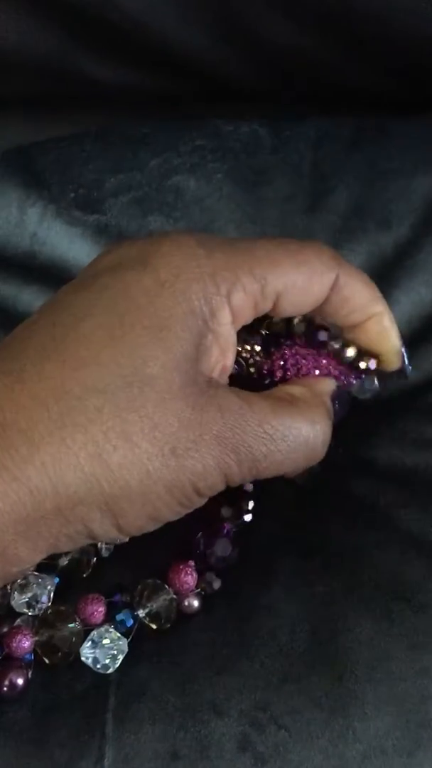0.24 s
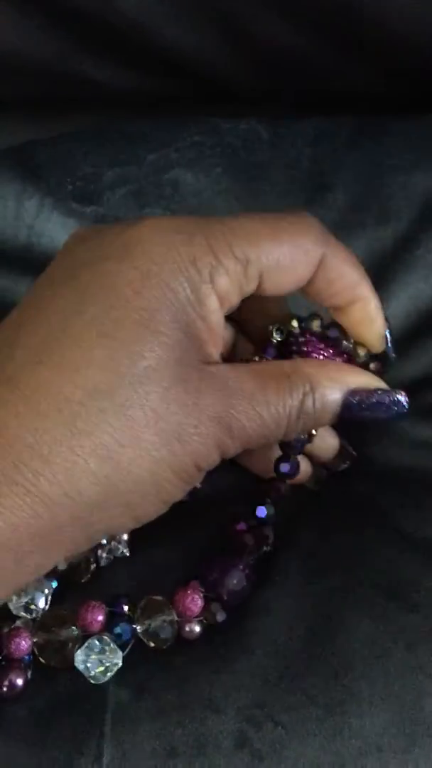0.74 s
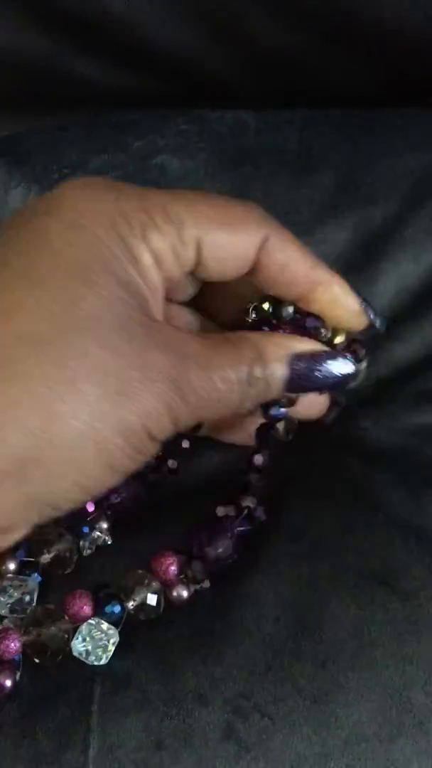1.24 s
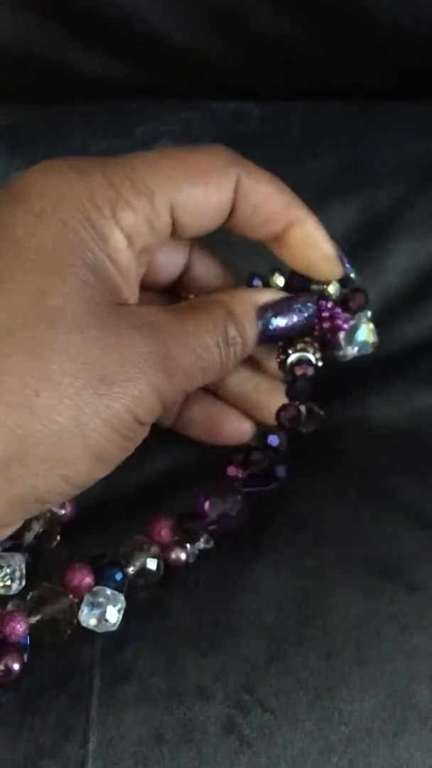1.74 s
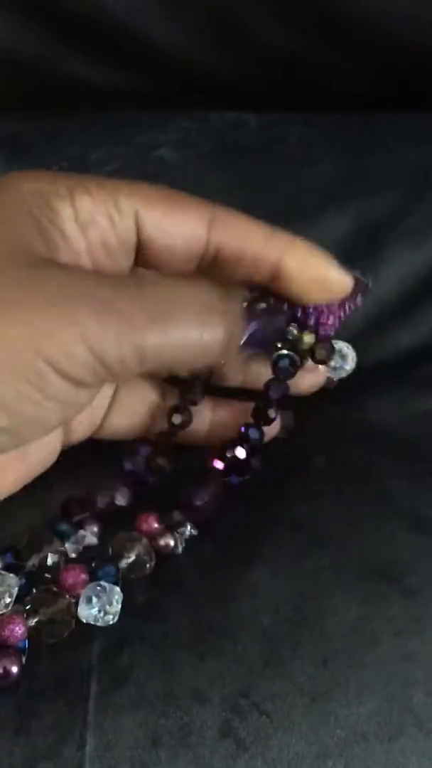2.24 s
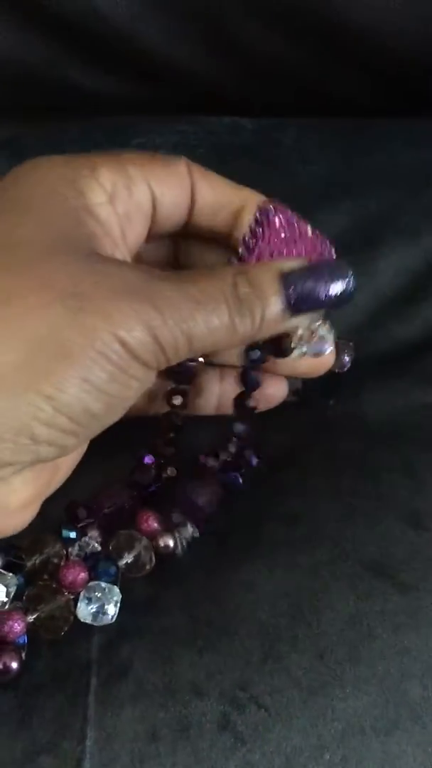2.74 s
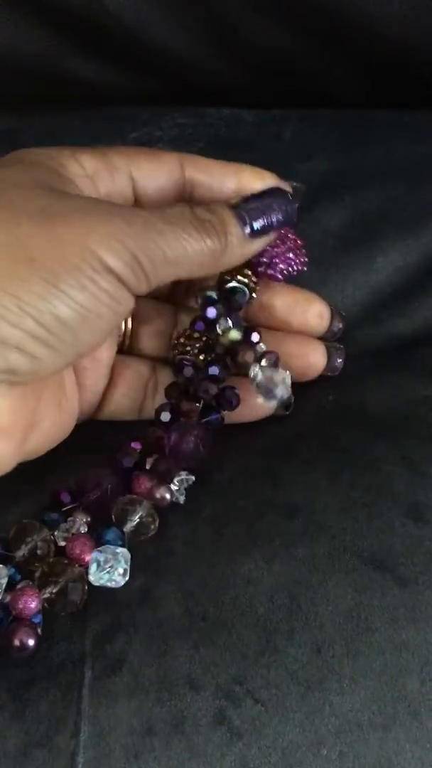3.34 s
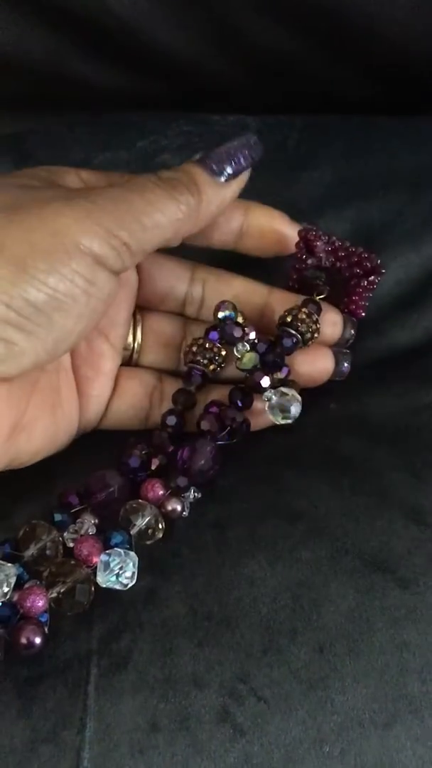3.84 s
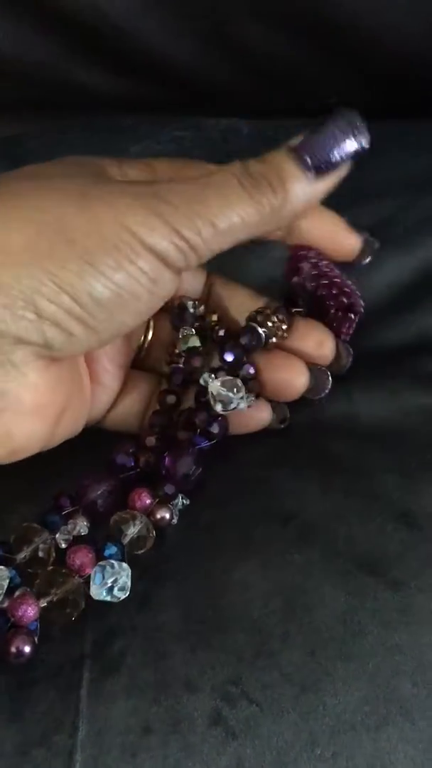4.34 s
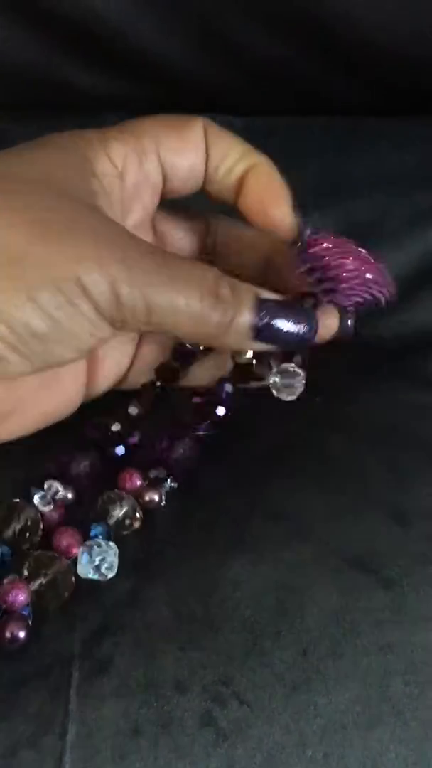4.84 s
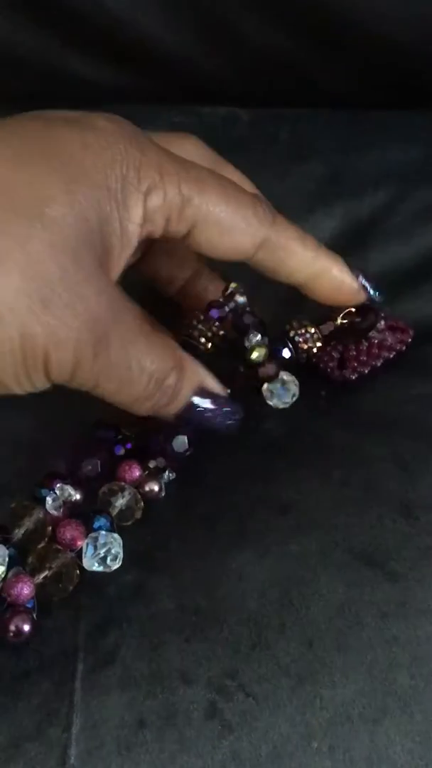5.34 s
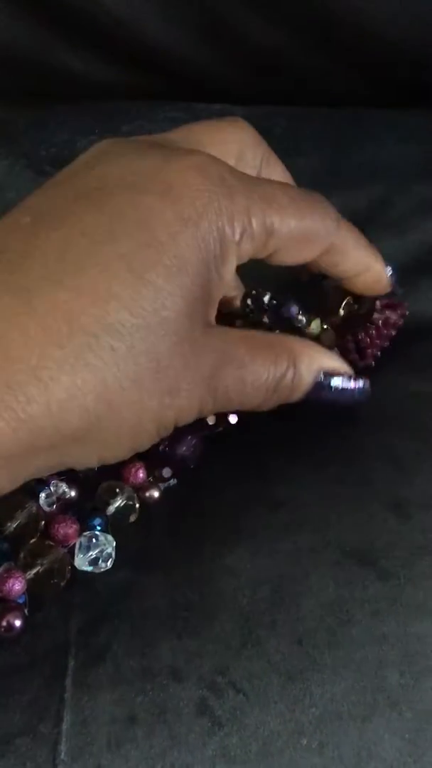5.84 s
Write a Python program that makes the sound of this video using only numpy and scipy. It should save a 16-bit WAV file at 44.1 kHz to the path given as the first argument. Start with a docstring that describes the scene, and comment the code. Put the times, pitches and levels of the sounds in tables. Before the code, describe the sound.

Close to the microphone in a quiet, small, dry room, a hand handles faceted glass beads on a velvet cushion. Faint ticks and soft bumps open; at 0.28 s a click leads into a loud, tight cluster of hard, bright snaps at 0.32-0.35 s, with a dull low thump, rattling on to 0.47 s. Single clicks follow at 0.58, 0.92 (with a thump), a very sharp one at 1.0, then 1.16 and 1.28 s. A light run of clicks and a brief grind fill 1.5-1.75 s, with softer ones around 1.95-2.15 s. After faint ticks, a clear snap lands at 2.84 s, then a small flurry at 3.0-3.2 s. From 3.5 to 4.5 s it is nearly still. Light ticks return at 4.6 s, skin brushes velvet at 4.8 s, and sparse delicate clicks continue to 6.1 s over faint hiss and low hum.

```python
"""Glass beads on a cushion

A hand turns a strand of faceted glass beads on a velvet cushion, close to a phone.
Beads snap together in sharp blows and small rebounds that ring a set of resonances; grinds are runs of these.
The hand thumps the cushion with sinking low swings and slides on it as grainy, coloured noise.
The walls answer with short echoes and a noise tail; a low hum and a steady hiss lie underneath."""
import sys
import numpy as np
from scipy import signal
from scipy.fft import rfft, irfft, next_fast_len
from scipy.io import wavfile
from scipy.ndimage import map_coordinates

SR = 44100
rng = np.random.default_rng(int(sys.argv[2]) if len(sys.argv) > 2 else 0)


def invert_db(x):
    """Field ratio 10**(x/20) for x, a level in decibels (scalar or array-like)."""
    u = np.asarray(x, float) / 20
    return 10 ** u


def inscribe(sig):
    """Save sig as 16-bit PCM at rate SR to the path in sys.argv[1].

    A 1-D sig is mono; a 2-D sig holds one channel per row.
    Samples are clipped to [-1, 1] before scaling.
    """
    pcm = np.round(np.clip(np.atleast_2d(sig).T, -1, 1) * 32767)
    wavfile.write(sys.argv[1], SR, pcm.astype(np.int16))


N = 268827  # length of the scene in samples

# Spectrum of the steady hiss, shape only: pitch_hz, level_db (per Hz)
HISS_SPECTRUM = [(240, -34), (400, 1), (606, -3), (2170, -9.5), (2950, -14.5), (4550, -15.5), (12400, -18),
                 (15800, -23)]
# How long the wall tail takes to lose 60 dB: pitch_hz, decay_s
WALL_DECAY = [(500, 0.25), (3000, 0.19), (8000, 0.12), (15000, 0.047)]
# Echoes from the cushion edge and nearest walls: delay_ms, level_db
WALL_ECHOES = [(5.5, -38.5), (10.5, -21.5), (15, -31), (19.5, -34.5)]
# Skin sliding over velvet and beads, the slow part: time_s, level_db
SLIDE_LEVEL = [(0, -72.5), (.29, -75), (.5, -69), (.68, -67), (.78, -74.5), (.9, -66.5), (1.3, -67.5),
               (1.66, -69), (1.72, -76), (1.9, -78.5), (2.3, -73.5), (2.68, -77), (3.34, -72),
               (3.95, -78.5), (4.11, -75), (4.74, -77.5), (4.765, -65), (4.9, -66), (4.99, -78.5),
               (5.18, -68.5), (5.32, -73), (5.75, -75.5), (6.094, -72.5)]
# Pressure of the hand, which guides the rumble and the hum: time_s, level_db
PRESS_LEVEL = [(0, -61.5), (.27, -65), (.47, -57), (.61, -63), (1.5, -62), (1.75, -64.5), (2.4, -71),
               (2.86, -69.5), (3.3, -66), (4.2, -71), (4.55, -70.5), (4.65, -65), (5.05, -65.5), (5.2, -68),
               (5.5, -65.5), (6.09, -66)]
# Spectrum of skin on velvet, shape only: pitch_hz, level_db (per Hz)
RUSTLE_SPECTRUM = [(290, -35.5), (500, -7), (817, -1.5), (1140, -0.5), (1780, -3), (2120, -1.5),
                   (2910, -7.5), (6090, -11), (15800, -22.5)]
# Spectrum of the brighter part of the sliding, shape only: pitch_hz, level_db (per Hz)
SIZZLE_SPECTRUM = [(1500, -36.5), (3500, 4), (6500, -0.5), (10000, -1.5), (16000, -9)]
# Spectrum of the cushion rumbling, shape only: pitch_hz, level_db (per Hz)
RUMBLE_SPECTRUM = [(15, -45.5), (25, -15), (48, 2.5), (119, -8), (189, -10.5), (226, -11), (390, -15.5),
                   (700, -30), (910, -65), (1540, -120)]
# The hand bumps the cushion: time_s, peak_db, starting_pitch_hz, knock_peak_db
BUMPS = [(.04, -49, 205, -49.5), (0.073, -45.5, 175, -56), (0.176, -37, 269, -46.5), (.287, -35, 151, -69),
         (0.3267, -33.5, 234, -50), (0.3332, -30.5, 240, -41), (0.3401, -28, 263, -47),
         (0.3466, -18, 180, -46), (0.3787, -40, 156, -62), (0.4133, -40, 171, -51), (.438, -24.5, 205, -50),
         (.4602, -30.5, 202, -49.5), (0.4662, -29, 163, -56), (0.5813, -42, 206, -70),
         (0.9182, -23.5, 173, -42), (1.0044, -49, 193, -51.5), (1.1454, -43, 225, -55),
         (1.199, -50.5, 200, -55), (1.2767, -42, 165, -72), (1.509, -49.5, 152, -62.5),
         (1.5692, -38.5, 166, -48.5), (2.087, -46, 115, -51), (3.122, -48, 215, -71.5),
         (3.662, -54.5, 234, -59), (5.0501, -43, 274, -57), (5.0841, -43, 212, -54), (5.527, -62, 203, -54),
         (5.705, -66, 195, -57), (5.9997, -41, 190, -53.5)]
# What the beads and the hollow of the hand ring with: pitch_hz, width_hz, level_db
RESONANCES = [(1200, 600, -21), (2468, 810, -12.5), (3510, 660, -5.5), (4650, 1200, -7.5), (6200, 380, 1.5),
              (7030, 2100, -4), (9000, 860, 0), (10800, 2500, -2.5), (12120, 1660, 1), (14700, 3500, -10.5)]
# Facets grinding past each other: start_s, length_ms, typical_contact_peak_db, favoured_pitch_hz
GRIND_EVENTS = [(0.896, 16, -69.5, 6500), (1.561, 11.6, -32, 6700), (1.643, 5.6, -42, 6400),
                (3.045, 27.2, -52, 6200), (4.765, 148, -64.5, 6220), (.35, 30, -44, 4650),
                (2.482, 59, -60.5, 6150), (2.982, 12, -50.5, 5500), (3.221, 28, -62, 4700),
                (3.478, 20.4, -53, 6200), (4.516, 30, -63.5, 7000), (4.61, 26, -64.5, 6200),
                (4.991, 19, -61.5, 6200)]
# Bead contacts: time_s, peak_db, favoured_pitch_hz, low_rings_db, high_rings_db
# (the two ring columns are relative settings; snap() adds the same amount to both)
CONTACTS = [(.0394, -44, 3660, 2, -20), (.0618, -42, 9100, -1, -2), (.1775, -42, 3560, -6, -12),
            (0.223, -47.5, 9110, -2, -22.5), (0.277, -21, 5600, -3.5, -5),
            (0.324, -4.5, 12750, -16.5, -3.5), (0.3261, -18, 9000, -5.5, 8.5), (.331, -13, 12400, -8, -7),
            (0.3359, -6, 9000, -2.5, -11), (0.3392, -10, 4650, -2, 1), (0.3414, -6, 9000, -2.5, -5),
            (0.3464, -15.5, 4650, 5, -20), (0.3771, -29, 10800, 9, 0.5), (.41, -27, 9000, -4, -6),
            (.4299, -23.5, 9000, -8, -3), (.4361, -26.5, 9500, 17, -11), (.4465, -39.5, 4600, 3, -10),
            (0.4578, -28, 6400, 20, -1), (0.4633, -19, 9000, 7, -1), (0.577, -20, 9000, -13.5, -5.5),
            (0.6668, -44, 8770, 3, -12), (.915, -11, 6540, -9, 0.5), (0.9767, -48.5, 7300, 0, -2),
            (.9906, -44.5, 9000, -2, -17), (1.0027, -3.5, 8640, -19.5, -5.5),
            (1.1299, -29.5, 8800, -11, -5), (1.1595, -15.5, 9100, -15, -5.5), (1.198, -29.5, 4200, 5, 1.5),
            (1.231, -35.5, 9000, -12.5, -13.5), (1.2345, -39, 9000, 4, -1),
            (1.276, -9.5, 8330, -10.5, -4.5), (1.2801, -21.5, 6830, -15, -5.5), (1.503, -42, 4260, 9, -20),
            (1.507, -28, 8450, -6.5, -16), (1.5452, -43, 12600, -4, 8), (1.5642, -22.5, 8400, -11, -12),
            (1.5676, -23, 8600, -6, -10), (1.5727, -23.5, 10100, -4, -2), (1.5988, -25.5, 6360, -4, -20),
            (1.627, -25.5, 11020, -6.5, -8), (1.631, -22.5, 6800, -17, -10),
            (1.6375, -22.5, 6400, -14, -10), (1.6502, -23, 6100, 3.5, -28), (1.654, -33.5, 6260, 0.5, -16),
            (1.667, -37.5, 6560, 4, -4), (1.6828, -37, 11300, 1, -5), (1.6863, -39, 6330, -12.5, -5),
            (1.7355, -31.5, 6260, -5.5, -10.5), (1.79, -44, 6400, -2.5, -8), (1.839, -32, 7000, -6.5, -5.5),
            (1.9389, -25, 8900, -9.5, -18), (1.9795, -20.5, 7670, -8.5, -20),
            (1.983, -29, 6500, -10.5, -19), (1.9873, -45, 6570, -11.5, -21), (2.038, -38.5, 4100, 0, -17),
            (2.0732, -32.5, 5940, -9, -11), (2.0769, -37, 5550, -5.5, 1), (2.0815, -37.5, 6500, 1, -13.5),
            (2.0865, -35.5, 6500, 11, -7), (2.0988, -38.5, 6070, 8.5, -19.5), (2.1057, -27.5, 6200, -6, -8),
            (2.112, -30, 6180, -6, -16), (2.116, -36.5, 5600, 4, -3), (2.134, -46, 4650, 4, -17),
            (2.145, -33, 9900, -2.5, -9.5), (2.2597, -46.5, 6600, -7, -20.5), (2.277, -42, 5630, -3.5, -16),
            (2.32, -44.5, 8560, -10, -12), (2.3993, -42, 6260, -16, -20), (2.415, -37.5, 9000, 4, -17),
            (2.4372, -42.5, 6460, 2.5, -16.5), (2.451, -43, 6440, -11, -5), (2.4705, -37, 6800, -11.5, -9),
            (2.4765, -38, 6900, -3, -16), (2.784, -42, 6130, -8.5, -17), (2.8433, -17, 5770, -13.5, -10.5),
            (2.8547, -29, 9000, -3.5, -3), (2.864, -40.5, 11060, 5.5, -2), (2.8681, -43, 11300, -18, 9),
            (2.9194, -46, 6300, -5, -8), (2.9933, -40, 4590, 3.5, -7), (2.996, -41, 5740, -14, -15.5),
            (3.0, -33, 7800, -4, -21), (3.033, -35.5, 9000, -5.5, -5), (3.0409, -30, 6140, -4, -5),
            (3.0482, -24.5, 11640, -9, -6), (3.055, -28.5, 9300, -4, -11), (3.059, -31.5, 6260, 3, -12),
            (3.066, -37, 9100, -4, -5), (3.0895, -39, 8800, -4, -8), (3.1143, -35.5, 8560, -14, -13),
            (3.1198, -32, 7740, -14, -8.5), (3.1243, -45.5, 6660, -14, -11), (3.1576, -30, 9000, -7, -11),
            (3.1721, -31.5, 9000, 0.5, 3), (3.1762, -40.5, 6060, -3, -5.5), (3.218, -44.5, 9350, 2, -6),
            (3.359, -43.5, 8000, -9.5, -12), (3.415, -50, 8140, -8, -14), (3.4577, -39.5, 8150, -26, -7),
            (3.5053, -35, 8930, -10.5, -21.5), (3.5437, -51.5, 3570, 10, -12),
            (3.598, -31.5, 12760, -7.5, 1.5), (3.659, -49, 4440, 3, -7.5), (3.672, -49.5, 3220, 21.5, -7.5),
            (3.881, -52.5, 4330, 4, -14), (4.2915, -45.5, 6250, 3, -11), (4.4011, -51, 6200, -17.5, -3),
            (4.426, -47.5, 6840, -4.5, -13), (4.4564, -48.5, 8270, -4, -16), (4.5435, -44, 7100, -1, -8.5),
            (4.5851, -36.5, 12500, 1, -8), (4.6033, -27.5, 6200, -5, -12), (4.794, -42.5, 8360, -8, -5.5),
            (4.8917, -44, 6200, -5, -7.5), (4.9214, -33, 12900, -12.5, -6), (4.9598, -39.5, 8600, -8, -8),
            (5.0232, -32.5, 10900, -8, -3.5), (5.0292, -31, 8840, -9.5, -4), (5.0332, -32.5, 6200, -20, -5),
            (5.053, -36.5, 6100, -4, -24.5), (5.0816, -39, 9000, 2.5, -22), (5.147, -38.5, 8750, 0.5, -11),
            (5.1578, -33.5, 6200, -14, -9), (5.166, -37.5, 8160, -10, -8.5),
            (5.2218, -49, 10000, -14, -2.5), (5.3411, -30, 6200, -6, -23.5), (5.467, -49.5, 4700, 2, -17),
            (5.4858, -45, 8800, -7, -5.5), (5.5264, -50, 3630, -1, -8), (5.539, -47.5, 6200, 2.5, -12.5),
            (5.7829, -32.5, 6200, -5.5, -25), (5.886, -49.5, 6270, 0.5, -11.5),
            (5.9292, -31.5, 6200, 4, -19), (5.931, -33, 6300, 4.5, -22), (5.953, -43.5, 4170, 2, 3),
            (5.956, -34.5, 6250, -6.5, -11.5), (5.998, -28.5, 8700, -7.5, -10),
            (6.0026, -38, 6200, -2, -13), (6.0361, -40.5, 6200, 5, -21), (6.0488, -42, 6640, -8, -20),
            (6.0643, -42.5, 3720, -0.5, -9)]

LEAD = 70  # samples of rising lead-in before a blow


def unit(x):
    """Scales a sound to rms 1."""
    return x / np.sqrt(np.mean(x ** 2) + 1e-20)


def along(points, hz):
    """Reads a curve of (Hz, value) points on a log pitch axis."""
    f, v = np.transpose(points)
    return np.interp(np.log(hz + 1), np.log(f + 1), v)


def curve(rows):
    """Joins (s, value) rows with straight lines, one value per sample."""
    s, v = np.transpose(rows)
    return np.interp(np.arange(N) / SR, s, v)


def wobble(rate):
    """Draws a smooth random curve with this many knots a second."""
    knots = rng.standard_normal(int(N * rate / SR) + 4)
    return map_coordinates(knots, [np.arange(N) * rate / SR])


def coloured(x, spectrum):
    """Filters x to a spectrum and scales it to rms 1."""
    m = next_fast_len(N + 8192)
    gain = invert_db(along(spectrum, np.fft.rfftfreq(m, 1 / SR)))
    return unit(irfft(rfft(x, m) * gain, m)[:N])


def hiss():
    """Steady room air and microphone noise: coloured random samples."""
    return invert_db(-86.5) * coloured(rng.standard_normal(N), HISS_SPECTRUM)


def hum():
    """A narrow band of noise, an unsteady low hum that rises and falls with the pressure of the hand."""
    pitch_hz, width_hz = 116, 16
    band = [(pitch_hz - 3 * width_hz, -60), (pitch_hz - width_hz, -12), (pitch_hz, 0),
            (pitch_hz + width_hz, -12), (pitch_hz + 3 * width_hz, -60)]
    level_db = curve(PRESS_LEVEL) - 5 + 2 * wobble(2.9)
    return invert_db(level_db) * coloured(rng.standard_normal(N), band)


def walls(x):
    """A few smeared slaps and a diffuse tail; new ones each fifth of a second as the hand moves."""
    out, step = np.zeros(N + SR), SR // 5
    for at in range(0, N, step):
        # noise that fades at its own speed at each pitch
        hz, t, z = signal.stft(rng.standard_normal(SR // 3), SR, nperseg=256)
        fade = invert_db(-60 * t / along(WALL_DECAY, hz)[:, None])
        tail = signal.istft(z * fade, SR, nperseg=256)[1]
        tail = invert_db(-22.0) * tail / np.linalg.norm(tail)
        tail = np.pad(tail, (round(0.0059 * SR), 0))  # the tail waits 5.9 ms
        for ms, db in WALL_ECHOES:
            slap = rng.standard_normal(90) * np.exp(-np.arange(90) / 30)
            tail[round(ms * SR / 1000):][:90] += invert_db(db) * slap / np.linalg.norm(slap)
        wet = signal.fftconvolve(x[at:at + step], tail)
        out[at:at + len(wet)] += wet
    return out[:N]


def sliding():
    """Level in dB of the rubbing: the slow slide, and a brief swell around every click and bump."""
    stir_db, stir_grows, stir_s = -66, .3, 0.015  # strand dragged: level at a 0 dB click, dB per dB, fade time
    jolt_db, jolt_s = -46, 0.01  # skin shifted: level against the bump's peak, fade time
    swells, t = np.zeros((2, N)), np.arange(-SR // 4, SR // 4 + 1) / SR
    for s, db, *_ in CONTACTS:
        swells[0, round(s * SR)] = invert_db(2 * (stir_db + stir_grows * db))
    for s, db, *_ in BUMPS:
        swells[1, round(s * SR)] = invert_db(2 * (jolt_db + db))
    shape = np.exp(-np.abs(t) / np.array([[stir_s], [jolt_s]]))  # swells before and after the event
    swell_power = np.abs(signal.fftconvolve(swells, shape, "same", axes=1).sum(0))
    power = invert_db(2 * curve(SLIDE_LEVEL)) + swell_power
    return 10 * np.log10(power)


def hand(slide_db):
    """Skin drags over the pile in fine grains, brighter when faster; pressure rumbles in lumps."""
    grains = rng.standard_normal((2, N)) * invert_db(2 * wobble(400) + wobble(40))
    rustle = invert_db(slide_db + 0.5) * coloured(grains[0], RUSTLE_SPECTRUM)
    sizzle_db = -72.5 + 1.2 * (slide_db + 71)  # grows faster than the rustle
    sizzle = invert_db(sizzle_db) * coloured(grains[1], SIZZLE_SPECTRUM)
    lumps = rng.standard_normal(N) * invert_db(2.8 * wobble(25))
    rumble = invert_db(curve(PRESS_LEVEL) + 3.5) * coloured(lumps, RUMBLE_SPECTRUM)
    return rustle + sizzle + rumble


def thumps():
    """Soft bumps: a low swing that sinks and dies in a few cycles, with a short knock of knuckle or nail."""
    sag_to, sag_s = .72, 0.019  # the pitch sinks to this share, with this time constant
    cycles = 4.6  # swings at the starting pitch until the low swing has lost 60 dB
    slap_ratio, slap_db, slap_t60_s = 2.1, -14.5, 0.024  # a short upper swing, set against the low one
    out, t = np.zeros(N + SR), np.arange(SR // 8) / SR
    luck = rng.standard_normal((len(BUMPS), 2))
    for (s, db, hz, knock_db), row in zip(BUMPS, luck):
        turns = hz * (sag_to * t + (1 - sag_to) * sag_s * (1 - np.exp(-t / sag_s)))
        swing_rise = (1 - np.exp(-t / 0.0016)) ** 2
        swing = -np.sin(2 * np.pi * turns) * invert_db(-60 * t * hz / cycles) * swing_rise
        slap = invert_db(slap_db - 60 * t / slap_t60_s) * np.sin(2 * np.pi * slap_ratio * hz * t)
        swing = swing - slap * (1 - np.exp(-t / 0.0022))
        low_ring = np.sin(2 * np.pi * 560 * invert_db(row[0]) * t)  # each knock has its own pitches
        high_ring = 1.8 * np.sin(2 * np.pi * 1050 * invert_db(row[1]) * t)
        knock = (low_ring + high_ring) * invert_db(-60 * t / 0.013) * (1 - np.exp(-t / .0006))
        start = round((s - .002) * SR)  # begins 2 ms ahead of the listed time
        out[start:][:len(t)] += invert_db(db) * swing / np.abs(swing).max()
        out[start + round(.0015 * SR):][:len(t)] += invert_db(knock_db) * knock / np.abs(knock).max()
    return out[:N]


def snap(favoured_hz, low_db, high_db, chatter_ms, luck):
    """One contact of peak 1: a sharp blow and smaller rebounds, ringing the resonances at new strengths."""
    size = len(luck) // 2
    ms = (np.arange(size) - LEAD) * 1000 / SR
    fade_db = 17 * ms / np.clip(chatter_ms - .5, .3, 12)
    fade_db = np.where(ms < 0, 3 - 13 * ms, fade_db)  # a brief noisy rise leads into the blow
    blows = luck[:size] * np.abs(luck[size:]) * invert_db(-10.5 - fade_db)
    blows[LEAD] = 2.1  # the sharp blow itself
    hz = np.fft.rfftfreq(2 * size, 1 / SR)
    tilt = [(4600, low_db + 5.5), (6000, 0.0038), (9500, 0), (11000, high_db + 5.5)]
    body = 0
    for k, (centre, width, db) in enumerate(RESONANCES):
        # the pair that met rings near its own pitch
        favoured_db = 8 * np.exp(-((centre - favoured_hz) / 700) ** 2)
        level = invert_db(db + along(tilt, centre) + favoured_db + 1.6 * luck[size + k])
        resonance = 1j * hz * width / (centre * centre - hz * hz + 1j * hz * width)
        body = body + (-1) ** k * level * resonance
    click = irfft(rfft(blows, 2 * size) * body)
    return click / np.abs(click).max()


def grinds():
    """Facets grind past each other in quick uneven runs of tiny contacts."""
    out = np.zeros(N + SR)
    for s, ms, db, hz in GRIND_EVENTS:
        for row in rng.standard_normal((int(ms / 1.1) + 1, 1024)):
            at = round((s + rng.random() * ms / 1000) * SR)
            out[at:][:len(row)] += invert_db(db + 4.2 * row[-1]) * snap(hz, -10, -13.5, 2.1, row)
    return out[:N]


def beads(slide_db):
    """Listed bead contacts, and a crowd of faint ones that thickens as the hand slides."""
    out = np.zeros(N + SR)
    luck = rng.standard_normal((len(CONTACTS), 2048))
    for (s, db, hz, low_db, high_db), row in zip(CONTACTS, luck):
        chatter_ms = 2.83 * invert_db(1.96 * row[-1])  # rattling time, different for each contact
        out[round(s * SR) - LEAD:][:len(row)] += invert_db(db) * snap(hz, low_db, high_db, chatter_ms, row)
    # faint contacts gather where the rubbing is loud
    crowd = np.cumsum(np.exp(0.13 * (slide_db - slide_db.max())))
    faint = rng.random((500, 3))
    for (when, pitch, size), row in zip(faint, rng.standard_normal((len(faint), 1024))):
        at = np.searchsorted(crowd, when * crowd[-1])
        level_db = slide_db[at] + 5 - 3.2 * np.log(size + 0.0012)  # many soft, a few louder
        out[at:][:len(row)] += invert_db(level_db) * snap(3500 + 6000 * pitch, 0, -8.5, 1.0, row)
    return out[:N]


def scene():
    """Adds beads, grinds and bumps, with their wall echoes, to the hand, the hiss and the hum."""
    slide_db = sliding()
    near = beads(slide_db) + grinds() + thumps()
    return (near + walls(near) + hand(slide_db) + hiss() + hum())[None]


def top_cut(x):
    """Nothing passes above the cut-off."""
    return signal.sosfilt(signal.butter(12, 17160, fs=SR, output="sos"), x)


def record(dry):
    """A high-pass removes the deepest bass, below 48 Hz; a steep low-pass removes treble above 15950 Hz."""
    mix = signal.sosfilt(signal.butter(2, 48, "high", fs=SR, output="sos"), dry)
    mix = signal.sosfilt(signal.butter(28, 15950, "low", fs=SR, output="sos"), mix)
    return top_cut(mix)


dry = scene()
out = record(dry)
inscribe(out)
```